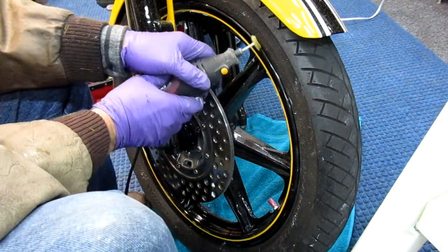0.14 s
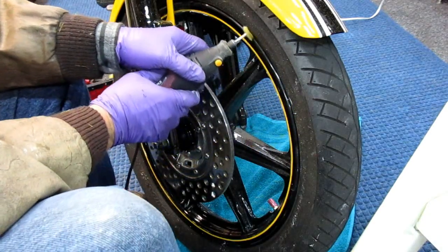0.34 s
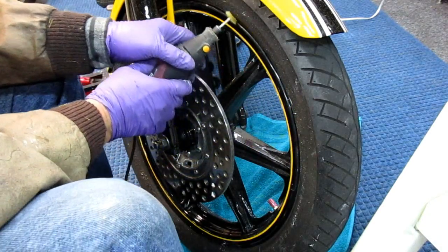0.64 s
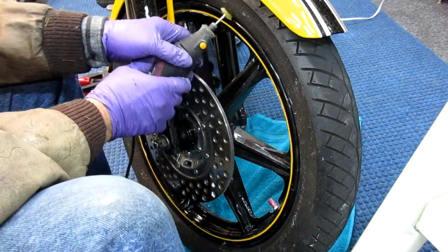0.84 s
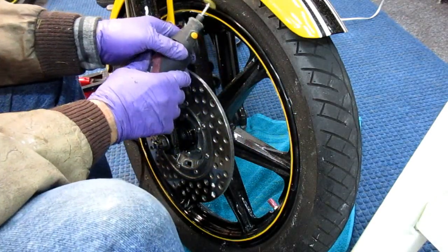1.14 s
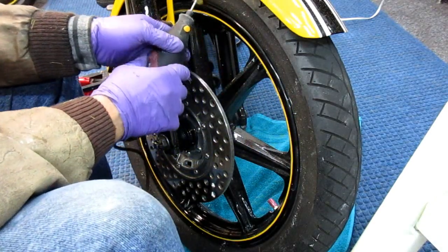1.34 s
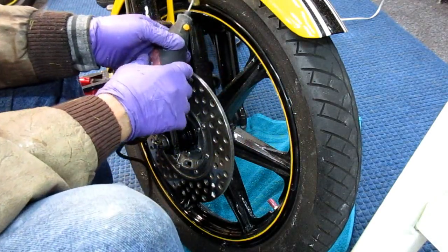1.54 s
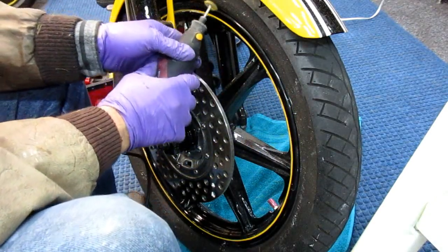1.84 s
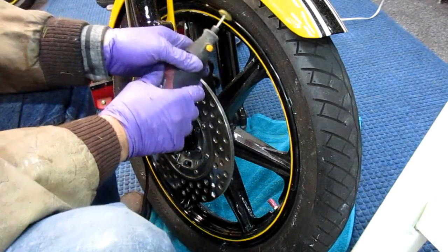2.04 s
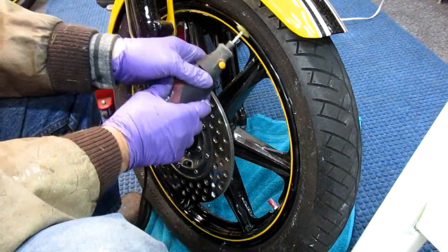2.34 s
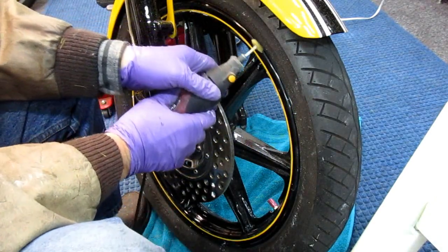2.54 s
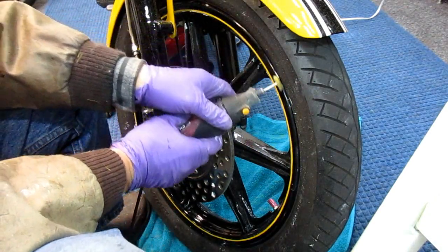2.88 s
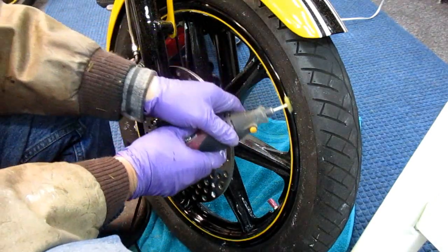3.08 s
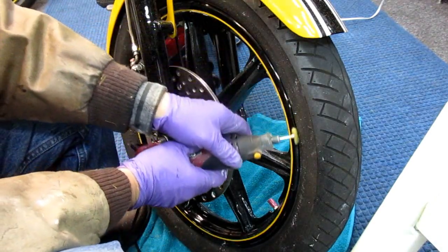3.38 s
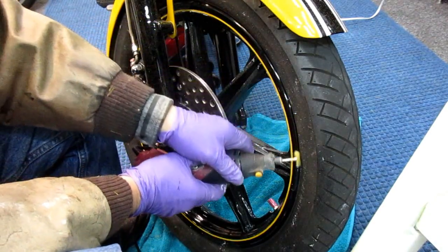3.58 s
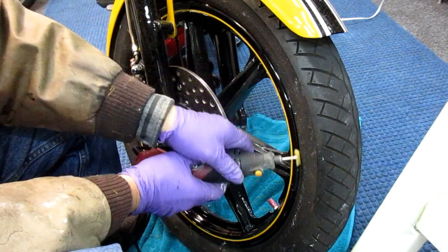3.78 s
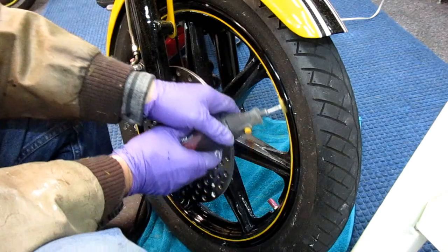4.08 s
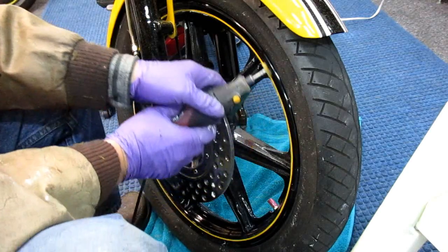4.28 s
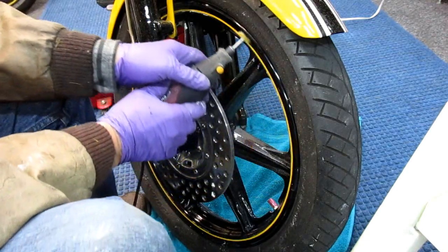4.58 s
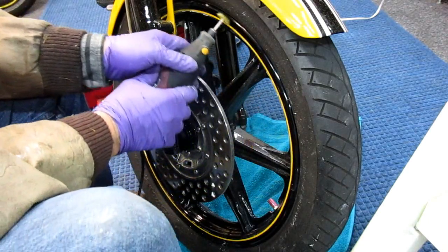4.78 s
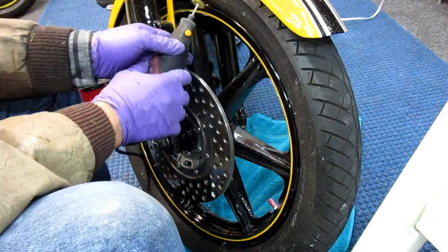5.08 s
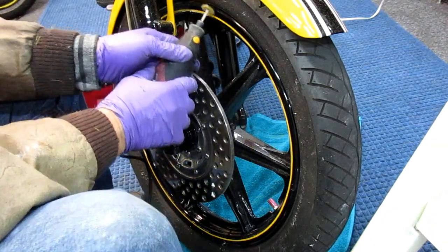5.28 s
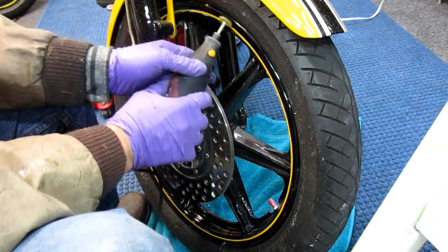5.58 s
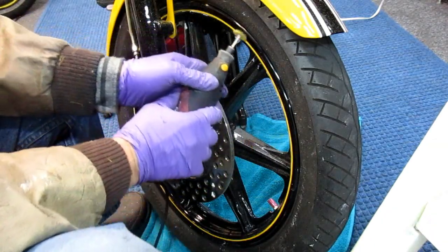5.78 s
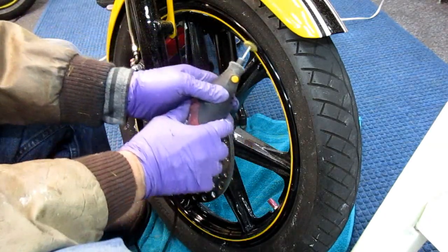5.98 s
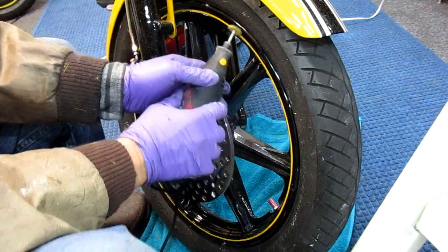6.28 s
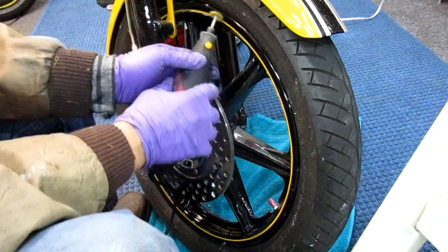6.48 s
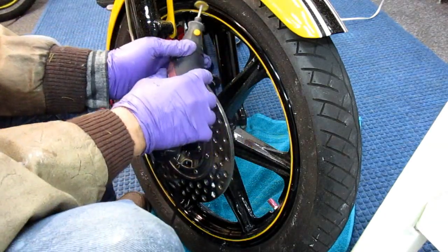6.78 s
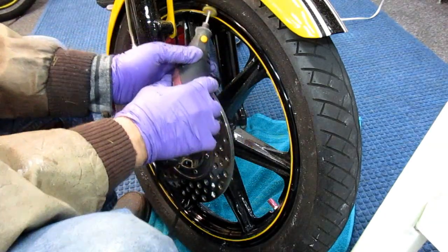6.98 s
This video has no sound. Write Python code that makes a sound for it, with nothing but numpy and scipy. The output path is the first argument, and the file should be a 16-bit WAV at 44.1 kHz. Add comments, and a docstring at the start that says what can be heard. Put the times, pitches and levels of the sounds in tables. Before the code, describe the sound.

A handheld rotary tool runs without a break, its felt bit polishing a motorcycle wheel rim. The high, buzzing motor whine carries a rubbing hiss and a fine chatter. Its pitch climbs over the first two seconds, sags in the middle, climbs higher again and then eases down, with a few brief rough bites along the way. The tool sounds close, over a faint low workshop rumble.

```python
"""In a workshop, a hand-held rotary tool polishes a wheel rim with a felt bit, at about 300 turns a second.
A rotating part excites harmonics (orders) of its speed: so sound the out-of-round bit, the armature
slots, shaft, commutator and fan, while the bearing balls pass at non-integer multiples. All glide as load
slows the motor, and mains ripple modulates bit and motor into a throb. Beneath the tones lie friction,
brush and air noise and a faint room rumble. Both channels are alike."""
import sys
import numpy as np
from scipy import signal
from scipy.fft import rfft, irfft, next_fast_len
from scipy.io import wavfile
from scipy.ndimage import uniform_filter1d

SR = 44100
rng = np.random.default_rng(int(sys.argv[2]) if len(sys.argv) > 2 else 0)


def output_pcm(signal):
    """Save a mono or channel-first signal as 16-bit PCM at the path in sys.argv[1].

    Samples are clipped to [-1, 1] before scaling.
    """
    pcm = np.clip(np.atleast_2d(signal).T, -1, 1) * 32767
    wavfile.write(sys.argv[1], SR, np.round(pcm).astype(np.int16))


N = 314300

# Load slows the motor. Each row: time in seconds, shaft speed in turns per second.
SHAFT_SPEED = [(0, 284.4), (.1, 279.5), (.35, 279.1), (.6, 285.5), (.8, 290), (.9, 286), (1.1, 294.1),
               (1.3, 307.3), (1.6, 316.5), (1.8, 325.3), (2.0, 331.8), (2.2, 331.2), (2.4, 326.5),
               (2.65, 315.8), (2.9, 296), (3.2, 291.4), (3.45, 281.7), (3.65, 280.4), (3.85, 287.8),
               (4.0, 290.3), (4.1, 300.4), (4.3, 330), (4.48, 338.3), (4.68, 353.6), (4.8, 348.3),
               (5.0, 335.8), (5.12, 324.7), (5.25, 326.1), (5.4, 333.8), (5.63, 357.1), (5.8, 348.5),
               (6.0, 341), (6.17, 327.9), (6.31, 326), (6.4, 313.3), (6.5, 302.5), (6.7, 304.7),
               (6.9, 296.5), (7.0, 302.8), (7.13, 320.3)]
# Pressure of bit on rim. Each row: time in seconds, level in dB about a steady stroke.
STROKE_PRESSURE = [(0, -1.5), (.55, 0), (.78, 4.5), (.95, 2.5), (1.04, 2.5), (1.27, -5.5), (1.4, -1),
                   (1.6, 3.5), (1.77, -0.5), (1.9, -0.5), (2.35, 0), (2.47, 5), (2.6, 1.5), (2.72, 5),
                   (2.85, 1.5), (3.12, 2), (3.3, 0), (3.62, -5.5), (4.0, 0), (4.2, -13), (4.32, -14),
                   (4.38, -4), (4.53, -4.5), (4.8, 4), (5.05, 2.5), (5.22, -7.5), (5.6, -7.5), (5.66, 1.5),
                   (5.77, 5), (6.03, 5.5), (6.18, -1), (6.32, 5.5), (6.46, -2), (6.72, -14), (6.78, -6),
                   (6.9, -5), (6.95, 0), (7.02, -9.5), (7.13, -10.5)]
# The felt bites the paint and lets go. Each row: start in seconds, extra pressure in dB, length in seconds.
FELT_BITES = [(1.289, 9.5, 0.053), (2.45, 2.5, 0.06), (4.324, 13.5, 0.042), (5.268, 9.5, 0.044),
              (5.623, 10, 0.031), (6.755, 6.5, 0.038)]
# Chatter of the bit. Each row: order, level in dB relative to the common chatter level.
CHATTER_ORDERS = [(11, -10), (12, -12), (13, -17), (14, -9.5), (15, -10.5), (17, -10.5), (18, -13.5),
                  (19, -14.5), (20, -22.5), (21, -19), (22, -31), (23, -17.5), (25, -21), (26, -26)]
# Slap of the bit. Each row: order, level in dB at steady pressure, share of the pressure swing.
SLAP_ORDERS = [(2, -29, 1), (4, -37.5, 1), (6, -29.5, 0.74)]
# Neighbours and octave of the slot tone. Each row: order, level in dB, share of the pressure swing.
SLOT_ORDERS = [(7, -32, 0.25), (9, -33, 0.46), (10, -32.5, 1), (16, -36, 0.1)]
# Buzz, the first sideband below the slot tone. Each row: time in seconds, level in dB.
BUZZ_LEVEL = [(0, -25), (.4, -23), (.68, -22.5), (1.08, -24.5), (1.45, -30), (1.75, -33), (2.25, -31),
              (2.55, -39), (2.93, -26.5), (3.2, -24.5), (3.35, -23.5), (3.72, -21.5), (4.06, -28),
              (4.36, -37), (4.65, -46), (4.83, -30), (5.0, -44), (5.08, -27), (5.3, -38), (5.53, -29),
              (5.62, -39), (5.85, -37), (6.0, -39), (6.36, -46), (6.48, -29), (6.7, -26), (6.79, -39),
              (7.0, -25), (7.13, -25)]
# Further sidebands. Each row: offset in multiples of the ripple, level in dB relative to the buzz.
SLOT_SIDEBANDS = [(-3, -17.5), (-2, -6.5), (1, -8.5), (2, -11), (3, -20)]
# Once-a-turn hum. Each row: time in seconds, level in dB.
UNBALANCE_LEVEL = [(0, -51), (1.06, -51), (1.19, -66), (1.28, -44.5), (2.24, -44.5), (2.62, -52),
                   (2.94, -55.5), (3.13, -66), (3.4, -50), (4.05, -55), (4.3, -46), (4.455, -61),
                   (4.7, -46), (4.86, -54), (5.19, -41.5), (5.4, -46), (5.55, -39), (6.34, -45),
                   (6.54, -52), (6.7, -49.5), (6.87, -53), (7.13, -40)]
# Shaft and commutator bars. Each row: order, level in dB, share of the pressure swing.
SHAFT_ORDERS = [(3, -41.5, 0.48), (5, -41.5, 0.84), (24, -46, -0.57)]
# Resonances and dips of tool and rim. Each row: centre in Hz, half width in Hz, gain in dB.
RESONANCES = [(548, 25, -5.5), (1039, 39, 2.5), (1129, 15.5, 8.5), (1228, 20, 8.5), (1314, 14, 6),
              (1606, 59, 11), (1970, 41, 4.5), (2140, 67, 2), (2261, 64, 7), (2391, 25, 3.5),
              (2930, 240, -1), (3355, 26, 0)]
# One order swells or sinks briefly. Each row: centre in seconds, order, gain in dB, half length in seconds.
ORDER_SWELLS = [(.5, 6, -16, 1), (0.36, 16, 10.5, 0.13), (1.078, 16, 9, 0.1), (1.08, 4, -3.5, 0.18),
                (1.332, 4, 8, 0.02), (1.544, 4, -4.5, 0.25), (1.62, 8, -16, 0.23), (1.649, 9, 7.5, .15),
                (1.7, 4, 12.5, .04), (2.035, 24, 10, 0.12), (2.158, 4, -8, 0.14), (2.198, 8, 6, 0.11),
                (2.322, 6, 7.5, 0.15), (2.479, 4, 3, 0.03), (2.503, 8, -11, 0.097), (2.7, 8, 3, 0.052),
                (2.95, 8, -23, 0.15), (3.3, 24, 11, .1), (3.353, 16, 11, 0.097), (3.45, 6, 6, 0.18),
                (3.749, 4, -5, .25), (4.353, 6, 7, 0.025), (4.691, 6, 7, 0.17), (4.719, 5, 12.5, 0.067),
                (4.822, 8, 7, 0.055), (4.853, 6, -16, 0.045), (4.875, 7, 8, 0.23), (4.894, 4, -12, 0.029),
                (5.014, 10, 8, 0.13), (5.29, 9, 10, 0.023), (5.42, 24, 5, .1), (5.721, 5, 11, 0.083),
                (5.85, 4, -9, 0.078), (6.108, 6, -16, 0.028), (6.111, 4, 10, 0.059), (6.15, 7, 7.5, 0.08),
                (6.298, 6, -9, 0.16), (6.362, 8, 11.5, 0.043), (6.392, 4, 13, 0.052), (6.78, 10, 9, 0.035),
                (6.881, 4, 20.5, 0.088), (7.1, 8, 7, 0.074), (.63, 12, 8, .1), (.79, 14, 11, 0.12),
                (0.912, 23, 6.5, 0.18), (.92, 24, 10, .09), (0.995, 19, 8, 0.074), (1.082, 22, 25, 0.15),
                (1.12, 3, 5.5, 0.09), (1.24, 5, 9, 0.052), (1.401, 20, 19.5, 0.098), (1.448, 6, 6.5, .08),
                (1.487, 16, 8, 0.23), (1.58, 10, -12, 0.068), (1.937, 10, -14, 0.14), (2.1, 15, 7, 0.13),
                (2.16, 13, 6, .15), (2.17, 17, 4, .15), (2.48, 15, 3, .1), (2.505, 14, 8, .06),
                (2.513, 19, 10, 0.069), (2.66, 9, -17, .12), (2.699, 10, -1.5, 0.08), (2.796, 5, 6, 0.18),
                (2.822, 21, 17, 0.12), (2.903, 4, 7, 0.063), (3.172, 5, 8, .09), (3.249, 10, -10, .07),
                (3.57, 20, 21, 0.22), (3.56, 24, 8, .14), (3.87, 7, -10, .07), (3.968, 15, 10, 0.097),
                (4.09, 10, -9, .07), (4.559, 16, -13, 0.27), (4.721, 9, -5, .09), (4.83, 16, 13, 0.062),
                (4.84, 15, 9, .1), (4.93, 13, 13, .1), (5.04, 17, 8, .06), (5.04, 18, 10, 0.065),
                (5.22, 6, -11, 0.11), (5.8, 12, 1, .15), (5.84, 7, -7, 0.13), (6.01, 13, 2, .15),
                (6.13, 8, -10, .04), (6.29, 12, 10, .06), (6.311, 14, 7, 0.061), (6.31, 17, 6, .06),
                (6.332, 18, 8, 0.062), (6.32, 16, -14, 0.12), (6.58, 4, 10, 0.12), (6.614, 10, 8, .1),
                (6.65, 7, 5, .07), (6.83, 12, 10, 0.089), (6.92, 16, 10, 0.11), (7.018, 6, -13, .12),
                (.25, 8, 3.5, 0.34), (1.877, 4, 6.5, .06), (4.603, 8, 4.5, 0.1), (5.16, 4, 7, .05),
                (5.897, 3, 6, 0.33), (6.019, 6, 6.5, .04), (6.776, 8, 5.5, .04), (.9, 2, 0.5, 0.15),
                (1.32, 10, 4, .04), (1.32, 11, -6, .04), (2.85, 2, -3, 0.24), (3.55, 40, 7, .25),
                (3.549, 44, 9, .25), (3.863, 16, 12, 0.046), (6.38, 11, 7, 0.037), (6.448, 2, 4.5, .05),
                (6.78, 12, 3, .03), (.15, 3, 4.5, .3), (1.9, 3, 4, 0.37), (4.15, 8, 3, 0.092),
                (4.87, 10, 3, 0.071), (5.29, 2, -4.5, .03), (5.42, 8, 2.5, .15), (6.65, 8, 2.5, .15)]
# Spectral shape within the noise bands. Each row: frequency in Hz, relative density in dB.
NOISE_SPECTRUM = [(300, -29.5), (500, -24), (800, -13.5), (1200, -15), (1700, -5.5), (2150, 3.5), (2900, 1),
                  (3600, -9.5), (4800, -8.5), (6300, -12), (9200, -26), (11500, -23.5), (15000, -30.5)]
# The four borders in Hz between the bands: drone, housing ring, rim ring, brush and felt hiss, fan air.
BAND_EDGES_HZ = [1508, 2480, 3380, 7500]
# Housing, rim, hiss and fan air. Each row: level in dB at steady pressure, share of the pressure swing.
BAND_LEVELS = [(-28, .05), (-29.5, 0.21), (-24, 0.19), (-33.5, 0.22)]
# The noise slowly changes colour. Each row: time in seconds, then drone, housing, rim, hiss, air gain in dB.
BAND_COLOUR = [(0, -2.5, -4, -1, -1.5, 1.5), (.5, -3, -3, -1, -1.5, 1), (.8, -1.5, -5, 2, -0.5, 0),
               (1.2, -1.5, -7, 3, 0.5, -1.5), (1.63, 0.5, -6, 8.5, -0.5, 1), (2.0, 0.5, 2, -2, -2, -1),
               (2.3, -3, 2, -6, 1.5, 1), (2.8, 1.5, 2.5, 3.5, -6, 0), (3.1, -2, -0.5, 1.5, 0, 2.5),
               (3.5, 0.5, -2, 0, -0.5, 5.5), (3.8, -3, -1, -10, -1, 3), (4.2, 3, 2.5, 4, -1, 0),
               (4.58, 4, 5, -11, -3.5, 0), (4.8, -3, 2, -2, 2.5, 2), (5.05, 0.5, -2, 2, -2.5, -1),
               (5.5, 5.5, 1, 1, -4, -0.5), (5.9, 1.5, 3, -3, -0.5, 1.5), (6.3, -2, 3.5, -5, 1.5, 1.5),
               (6.55, 2, 1, -2, -2.5, -4.5), (6.86, -1, 0.5, 2, 1, 1.5), (7.13, 3.5, 1, -14, -3.5, -3)]
# Fan and brush tones. Each row: order, level in dB relative to the fan air.
FAN_ORDERS = [(27, -27), (28, -19), (30, -23), (31, -18), (32, -15.5), (34, -17), (36, -18), (38, -19),
              (40, -24), (44, -38)]
# Ball-pass tones. Each row: shift in orders, outer and inner race level in dB relative to the hiss.
BEARING_TONES = [(0, -27, -52), (1, -37, -41), (2, -23.5, -17.5), (3, -20.5, -13), (4, -14.5, -13.5),
                 (5, -25, -31.5), (6, -37, -30), (7, -13, -28), (8, -21.5, -25), (9, -21, -16),
                 (10, -21.5, -51)]
# Workshop rumble. Each row: frequency in Hz, relative density in dB.
ROOM_SPECTRUM = [(20, -12), (40, -2), (70, 3.5), (110, 0.5), (160, -3.5), (300, -3.5), (600, -7)]

RIPPLE_HZ = 120   # the motor's pull pulses twice per mains cycle


def from_db(db):
    """Amplitude grows tenfold for every 20 dB."""
    return 10 ** (np.asarray(db) / 20)


def unit_rms(x):
    """Division by the rms gives a signal unit power."""
    return x / np.sqrt(np.mean(x ** 2) + 1e-20)


def curves(rows):
    """Linear interpolation in time gives each column one value per sample."""
    times, *columns = np.transpose(rows)
    return [np.interp(np.arange(N) / SR, times, column) for column in columns]


def drift(rate_hz):
    """Twice low-passed noise wanders slowly, with rms 1."""
    step, settle = 40, 2000
    pole = np.exp(-2 * np.pi * rate_hz * step / SR)
    noise = rng.standard_normal(N // step + settle + 2)
    slow = signal.lfilter([1], [1, -2 * pole, pole * pole], noise)[settle:]
    return np.interp(np.arange(N) / step, np.arange(len(slow)), unit_rms(slow))


def fading(depth_db, rate_hz):
    """Random fading in dB: a drift limited from above has deep dips and flat tops."""
    return depth_db * np.minimum(drift(rate_hz), 1.1)


def noise_band(spectrum, low_hz, high_hz):
    """Spectral weighting turns white noise into a coloured, soft-edged band of rms 1."""
    size = next_fast_len(N)
    hz = np.maximum(np.arange(size // 2 + 1) * SR / size, 1)
    points_hz, points_db = np.transpose(spectrum)
    shape = from_db(np.interp(np.log(hz), np.log(points_hz), points_db))
    band = 1 / np.sqrt((1 + (low_hz / hz) ** 16) * (1 + (hz / high_hz) ** 16))
    return unit_rms(irfft(rfft(rng.standard_normal(size)) * shape * band, size)[:N])


def tone(turns, level_db):
    """A sinusoid, its phase counted in turns, peaks at root two times its rms level."""
    return np.sqrt(2) * from_db(level_db) * np.cos(2 * np.pi * turns)


def throb(turns, depth):
    """Amplitude modulation: a gain that swells once a cycle."""
    return 1 + depth * np.cos(2 * np.pi * turns)


def emphasis_db(order, speed):
    """Forced response: an order rises or dips at each pitch of RESONANCES; its own swells are added."""
    step = 32
    t, hz = np.arange(0, N, step) / SR, order * speed[::step]
    response = sum(db * np.exp(-((hz - centre) / width) ** 2) for centre, width, db in RESONANCES)
    swells = sum(db * np.exp(-((t - centre) / half) ** 2)
                 for centre, k, db, half in ORDER_SWELLS if k == order)
    return np.repeat(response + swells, step)[:N]


def harmonics(rows, speed, shaft, ripple, press_db, waver_db, depth):
    """A periodic force sounds at multiples of its rate; each wavers and throbs in its own phase."""
    out = np.zeros(N)
    for order, db, share in rows:
        phase = order * shaft + rng.random()
        level_db = db + share * press_db + emphasis_db(order, speed) + waver_db * drift(7.3)
        out += tone(phase, level_db) * throb(ripple + rng.random(), depth)
    return out


def contact_pressure(bite_s=0.014, let_go_s=0.023):
    """The load in dB is the slow stroke plus a short trapezoidal pulse for each bite."""
    t = np.arange(N) / SR
    press_db = curves(STROKE_PRESSURE)[0]
    for start, db, length in FELT_BITES:
        ramps = np.minimum((t - start) / bite_s, (start + length - t) / let_go_s)
        press_db += db * np.clip(ramps, 0, 1)
    return press_db


def bit_slap(speed, shaft, ripple, press_db):
    """An out-of-round bit strikes the rim twice a turn and so excites even orders."""
    return harmonics(SLAP_ORDERS, speed, shaft, ripple, press_db, waver_db=2.12, depth=0.011)


def bit_chatter(speed, shaft, ripple, press_db):
    """Chattering contact excites high orders, which grow with pressure and fade at random."""
    chatter_db = -27.5 + 0.63 * press_db
    out = np.zeros(N)
    for order, db in CHATTER_ORDERS:
        level_db = chatter_db + db + emphasis_db(order, speed)
        out += tone(order * shaft + rng.random(), level_db + fading(4.9, rate_hz=8.2))
    return out * throb(ripple, depth=0.16)


def armature(speed, shaft, ripple, press_db, slots=8):
    """Passing slots make a tone; modulation adds sidebands that line up in one burst per ripple cycle."""
    slot_phase = slots * shaft
    slot_db = -29.5 + 0.1 * press_db + emphasis_db(slots, speed)
    buzz_db = curves(BUZZ_LEVEL)[0]
    out = tone(slot_phase + 0.17 * drift(0.97), slot_db) + tone(slot_phase - ripple, buzz_db)
    for offset, db in SLOT_SIDEBANDS:
        out += tone(slot_phase + offset * ripple, buzz_db + db + 0.95 * drift(5.6))
    return out + harmonics(SLOT_ORDERS, speed, shaft, ripple, press_db, waver_db=2.5, depth=0.28)


def shaft_and_commutator(speed, shaft, ripple, press_db):
    """Unbalance forces a hum once a turn; the shaft adds orders 3 and 5, the commutator bars order 24."""
    hum = tone(shaft, curves(UNBALANCE_LEVEL)[0])
    return hum + harmonics(SHAFT_ORDERS, speed, shaft, ripple, press_db, waver_db=2.5, depth=0.13)


def band_levels(press_db):
    """Noise grows with load: the drone's gain, then the housing, rim, hiss and air levels, in dB."""
    drone_gain_db, *colours = curves(BAND_COLOUR)
    levels = [db + share * press_db + colour_db for (db, share), colour_db in zip(BAND_LEVELS, colours)]
    return drone_gain_db, *levels


def friction(ripple, press_db, drone_gain_db, housing_db, rim_db, hiss_db):
    """Sliding friction is broadband: a drone, the ring of housing and rim, and brush and felt hiss."""
    drone_top, housing_top, rim_top, hiss_top = BAND_EDGES_HZ
    drone_rms = from_db(drone_gain_db + hiss_db - 11) + from_db(press_db - 54.5)
    drone = drone_rms * noise_band(NOISE_SPECTRUM, 180, drone_top)
    housing = from_db(housing_db) * noise_band(NOISE_SPECTRUM, drone_top, housing_top)
    rim = from_db(rim_db) * noise_band(NOISE_SPECTRUM, housing_top, rim_top)
    hiss = from_db(hiss_db) * noise_band(NOISE_SPECTRUM, rim_top, hiss_top)
    throbbing = housing * throb(ripple, 0.28) + rim * throb(ripple, 0.18) + hiss * throb(ripple, 0.08)
    return (drone + throbbing) * from_db(0.9 * drift(16))


def bearing(shaft, hiss_db, outer_passes=2.57, inner_passes=4.43):
    """Seven balls pass each race a non-integer number of times a turn; their tones rise with the hiss."""
    out = np.zeros(N)
    for shift, outer_db, inner_db in BEARING_TONES:
        swell_db = hiss_db + fading(10, rate_hz=1.67)
        out += tone((outer_passes + shift) * shaft + rng.random(), swell_db + outer_db)
        out += tone((inner_passes + shift) * shaft + rng.random(), swell_db + inner_db)
    return out


def fan_whine(speed, shaft, air_db, clear_hz=293, db_per_hz=-0.1286):
    """Masking: above a shaft speed of clear_hz the fan and brush orders sink into the air noise."""
    whine_db = air_db + db_per_hz * np.maximum(speed - clear_hz, 0)
    out = np.zeros(N)
    for order, db in FAN_ORDERS:
        level_db = whine_db + db + emphasis_db(order, speed)
        out += tone(order * shaft + rng.random(), level_db + fading(4.9, rate_hz=9.3))
    return out


def fan_air(air_db):
    """Turbulent air from the fan gives a flickering noise in the highest band."""
    return from_db(air_db + 0.86 * drift(8.8)) * noise_band(NOISE_SPECTRUM, BAND_EDGES_HZ[-1], SR / 2)


def workshop_rumble():
    """The noise floor of the room is steady and low in pitch."""
    return from_db(-53) * noise_band(ROOM_SPECTRUM, 15, 900)


def scene():
    """Superposition: tones, noise and rumble add, the same in both channels."""
    speed = uniform_filter1d(curves(SHAFT_SPEED)[0], size=2200)
    shaft = np.cumsum(speed) / SR + 0.0076 * drift(11.3)   # phase in turns, trembling a little
    ripple = RIPPLE_HZ * np.arange(N) / SR   # phase in cycles
    press_db = contact_pressure()
    drone_gain_db, housing_db, rim_db, hiss_db, air_db = band_levels(press_db)
    drive = speed, shaft, ripple, press_db
    tones = bit_chatter(*drive) + bit_slap(*drive) + armature(*drive) + shaft_and_commutator(*drive)
    tones += fan_whine(speed, shaft, air_db) + bearing(shaft, hiss_db)
    noise = friction(ripple, press_db, drone_gain_db, housing_db, rim_db, hiss_db) + fan_air(air_db)
    tool = tones + noise * throb(shaft, depth=0.045)
    return np.tile(tool + workshop_rumble(), (2, 1))


def record(dry, cutoff_hz=15050):
    """Band limiting: an elliptic low-pass cuts the top treble steeply."""
    return signal.sosfilt(signal.ellip(14, .3, 70, cutoff_hz, fs=SR, output="sos"), dry)


dry = scene()
out = record(dry)
output_pcm(out)
```